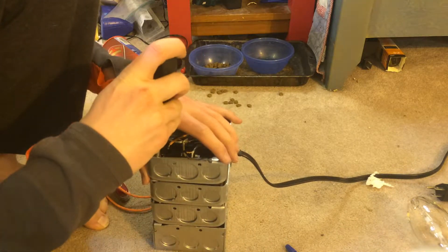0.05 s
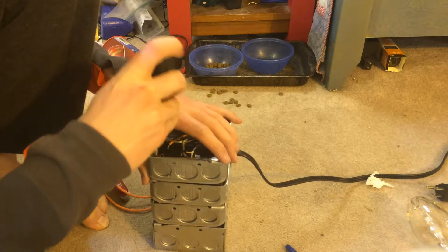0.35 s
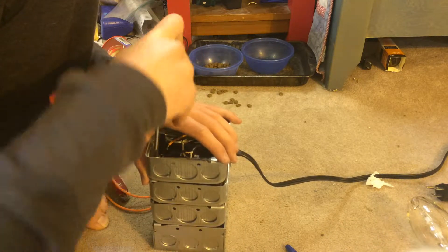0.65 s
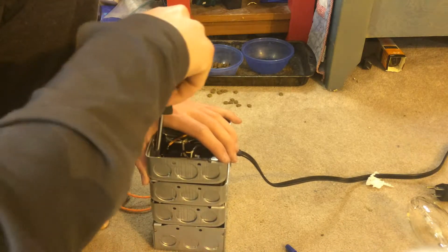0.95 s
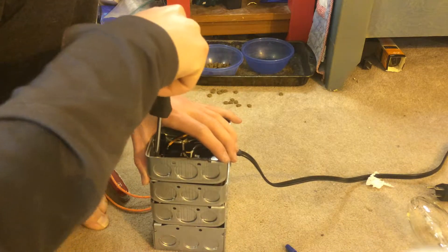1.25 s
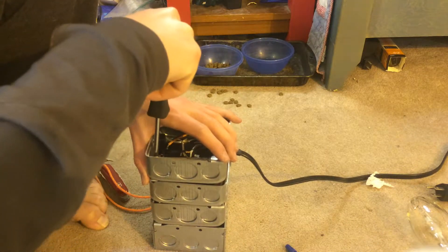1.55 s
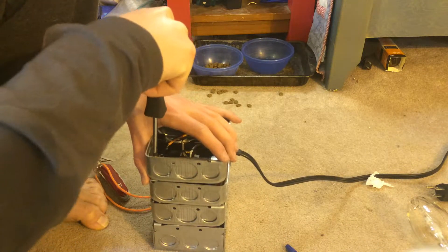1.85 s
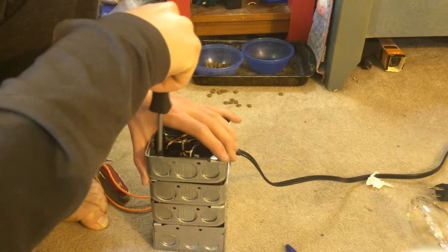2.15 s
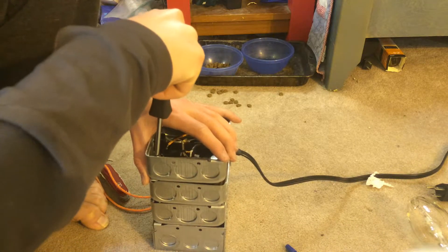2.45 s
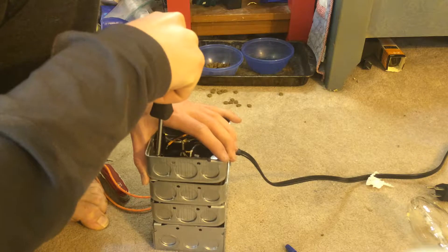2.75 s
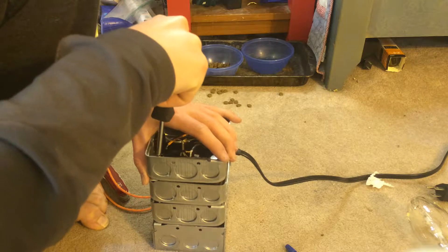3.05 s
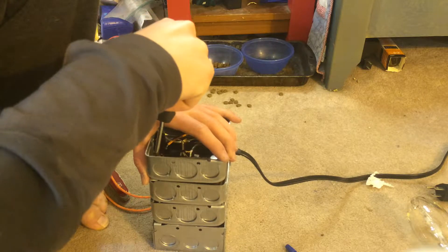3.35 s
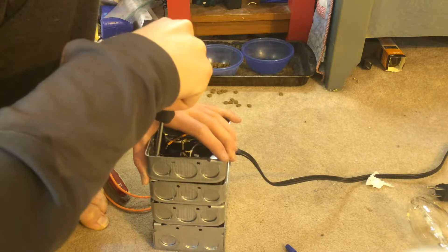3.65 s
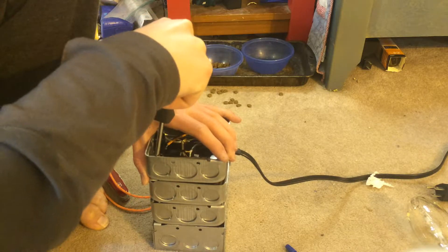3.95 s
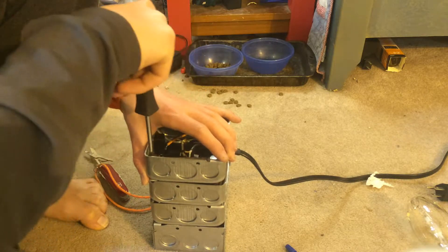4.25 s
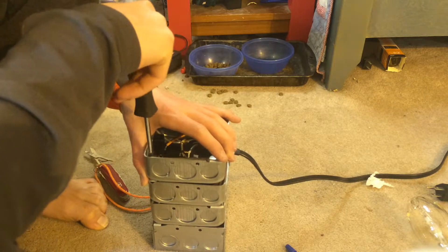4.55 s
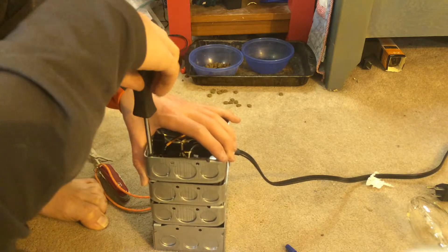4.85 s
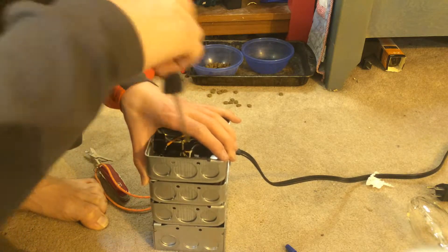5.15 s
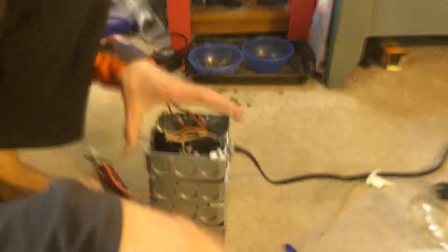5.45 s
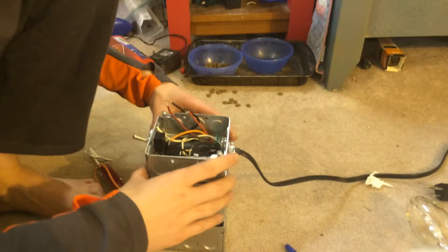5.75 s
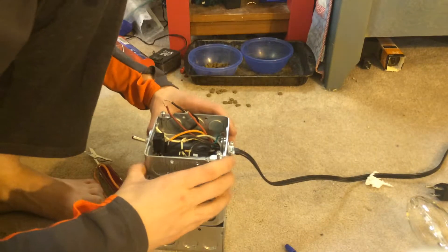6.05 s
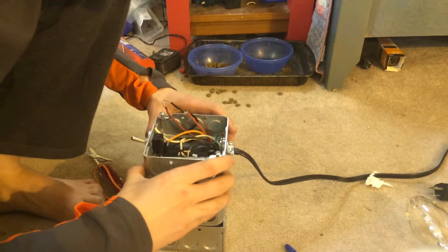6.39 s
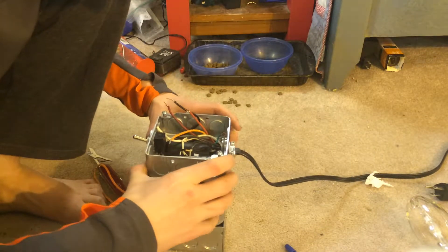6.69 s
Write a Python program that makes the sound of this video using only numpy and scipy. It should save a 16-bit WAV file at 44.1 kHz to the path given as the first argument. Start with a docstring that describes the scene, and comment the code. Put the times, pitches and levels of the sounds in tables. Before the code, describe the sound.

In a small carpeted room with a faint motor hum, hands softly brush a stack of steel boxes. A screwdriver turns a screw in the corner: the tip makes scattered sharp clicks, and the thread grinds briefly and squeaks once. Near the end the stack is grabbed and rocks on the carpet with a few dull, rattling knocks. The microphone is close, with only a short echo.

```python
"""A faint motor hum in a small carpeted room; close to the microphone, hands brush a stack of steel boxes.
A screwdriver works a screw in the stack's corner: its tip clicks in the screw head, ringing shaft and
box walls, and the thread grinds in tiny slips and squeaks once. Then the stack is grabbed and rocks
on the carpet with a few dull, rattling knocks. Mono, mostly direct sound, with a short room echo."""
import sys
import numpy as np
from scipy import signal
from scipy.fft import rfft, irfft
from scipy.io import wavfile
from scipy.ndimage import uniform_filter1d

SR = 44100
rng = np.random.default_rng(int(sys.argv[2]) if len(sys.argv) > 2 else 0)


def persist_wave(psi):
    """Save psi, clipped to +-1, as 16-bit WAV."""
    counts = np.round(np.clip(psi, -1, 1) * 32767).astype(np.int16)
    wavfile.write(sys.argv[1], SR, np.atleast_2d(counts).T)


N = 296350
TIME = np.arange(N) / SR

# Levels in the tables are relative; the functions set the balance at the microphone.
# spectrum of the room's air: pitch_hz, level_db
AIR_SPECTRUM = [(15, -50), (25, -28.5), (92, -11), (102, -5), (123, -4), (161, -23.5), (175, -16),
                (242, -27), (416, -27.5), (476, -28), (607, -33), (714, -34), (1790, -40.5), (14400, -47.5),
                (16000, -60)]
# lines of the motor hum: pitch_hz, level_db
MOTOR_LINES = [(119.8, -60), (150.7, -65.5), (240, -78.5), (360.5, -82), (479.3, -76.5)]
# decay of the room echo: pitch_hz, t60_s
ECHO_DECAY = [(100, 0.3), (400, 0.24), (1500, 0.42), (5000, 0.2), (15000, 0.23)]
# colour of the room echo: pitch_hz, level_db
ECHO_COLOUR = [(100, -2), (400, 1.5), (1400, -1), (3000, 6), (7000, 4.5), (15000, -8.5)]
# hands brush the boxes: start_s, end_s, level_db
HAND_STROKES = [(.17, .2, -69), (.27, .36, -73), (.56, .69, -77.5), (1.3, 1.43, -80), (1.86, 1.93, -77),
                (3.2, 3.24, -73.5), (5.48, 5.54, -66.5), (5.77, 5.92, -67), (6.2, 6.3, -75.5),
                (6.6, 6.72, -76)]
# panel resonances under a hand: pitch_hz, width_hz, gain_db
PANEL_RESONANCES = [(820, 310, 8), (1290, 1200, 5)]
# the stack shifts on the carpet: start_s, end_s, level_db
CARPET_STROKES = [(5.518, 5.54, -30), (5.54, 5.58, -32.5), (5.752, 5.782, -37), (5.8, 5.925, -50.5),
                  (5.93, 5.99, -50), (6.02, 6.06, -58)]
# floor resonance under the stack: pitch_hz, width_hz, gain_db
FLOOR_RESONANCE = [(110, 25, 7.5)]
# the stack rocks: start_s, level_db, contact_cutoff_hz, thump_db, rattle_db
STACK_BLOWS = [(5.5313, -6, 1589, 0, -20.5), (5.55, -19, 1705, 3.5, -9), (5.603, -17.5, 1264, -5, -27.5),
               (5.628, -24, 1250, -7, -40), (5.704, -29.5, 1250, -2, -31), (5.7238, -8, 1808, 1, -24),
               (5.764, -40, 385, 7.5, -18.5), (5.836, -40, 500, 1, -21), (5.9235, -17.5, 1077, -9, -27.5)]
# the stack's broad response to a blow: pitch_hz, width_hz, level_db
STACK_RESPONSE = [(121, 52, 5), (326, 140, 8.5), (410, 150, 6), (900, 152.2, 1.5), (1070, 160, 0),
                  (1555, 390, 0), (2850, 590, 4), (4440, 610, 7)]
# the stack's lasting modes: pitch_hz, level_db, t60_s
STACK_RINGING = [(85, -6.5, 0.28), (115.2, 1, 0.32), (184, -14, 0.19), (265, -12.5, .25),
                 (298, -0.5, 0.063), (348.5, 3, 0.26), (407, 1, 0.14), (440.4, -9.5, 0.23),
                 (574, -12.5, 0.4), (793, -10, 0.11), (918, -2.5, 0.17), (1045, -8, .12), (1100, -8, .12),
                 (1260, -8.5, 0.31), (1336, -10, 0.23), (1493, -9, 0.26), (1708, -18.5, 0.17),
                 (1920, -23.5, .35), (2444, -14, 0.31)]
# two bands where the stack hardly radiates, and one lift: pitch_hz, width_hz, gain_db
STACK_RADIATION = [(670, 108, -27.5), (2300, 370, -15), (3930, 250, 4.5)]
# the thread grinds: start_s, end_s, level_db
THREAD_STROKES = [(2.036, 2.08, -50.5), (2.08, 2.33, -67), (2.349, 2.408, -50), (3.18, 3.29, -75),
                  (3.287, 3.307, -57), (3.695, 3.725, -68.5), (3.79, 3.9, -73), (4.82, 4.95, -80)]
# resonances that the grinding brings out: pitch_hz, width_hz, gain_db
THREAD_RESONANCES = [(1250, 150, 11.5), (1808, 187, 7), (2450, 150, 6), (2920, 250, 7), (4760, 1300, 10),
                     (6640, 700, 6.5), (8400, 493, 2.5), (12910, 200, 12.5)]
# box wall modes under a light touch: pitch_hz, level_db, t60_s
WALL_MODES = [(353.5, -3.5, 0.081), (515.3, -5.5, 0.073), (679.4, -6.5, 0.0704), (766, -2.5, 0.062),
              (900, 1.5, 0.063), (1116, 2.5, 0.046), (1200, -0.5, .06), (1546, -2, 0.13)]
# shaft and screw resonances: pitch_hz, width_hz, gain_db
SHAFT_RESONANCES = [(1960, 170, 0), (4000, 1300, -9.5), (4513, 630, 10), (5434, 300, 6.5), (6800, 410, 10),
                    (7979, 1300, 9), (9250, 270, 0), (11700, 300, 2.5), (12800, 840, 2.5),
                    (14680, 700, 4.5)]
# the tip touches screw or box: start_s, steel_db, box_db, bright_db, ring_hz, tock_hz, rebound_s (0: none)
TIP_TOUCHES = [(0.291, -64, -56.5, -6, 4000, 545, .008), (0.396, -56, -54, -5.5, 3940, 1470, 0.0032),
               (1.318, -92, -66, -6, 3570, 575, 0), (1.607, -63, -72.5, -14, 2003, 1390, 0),
               (2.014, -35.5, -45.5, 5, 2078, 2080, 0.00041), (2.018, -20, -42, -5, 8220, 908.5, 0),
               (2.0318, -24.5, -45, 2.5, 11450, 1120, 0.0017), (2.077, -42, -48, -3, 7300, 864, 0),
               (2.199, -53, -68, -15, 4930, 640, 0.0019), (2.227, -56, -61, -4.5, 6664, 1250, 0.0018),
               (2.333, -30.5, -55.5, -2, 8810, 1544, 0), (2.347, -40, -57.5, -5, 8490, 2000, 0.002),
               (2.4143, -43, -45.5, -8, 4200, 1303, 0), (2.66, -66.5, -53, -3, 4700, 1090, 0.0003),
               (2.875, -32.5, -59, 0, 4712, 897.6, .011), (2.894, -44.5, -55, -3.5, 8240, 892, 0),
               (2.947, -71.5, -47.5, -8, 4174, 950, 0), (3.291, -50, -55, -12, 2220, 1301, 0.0039),
               (3.54, -39, -50, -10.5, 4020, 1136, 0.0021), (3.719, -60.5, -63.5, -2, 3820, 1290, 0.0033),
               (3.774, -50, -64, -1, 4450, 856.4, 0.014), (3.822, -55, -61, -6, 11240, 1490, 0.0024),
               (3.856, -52, -52, -5, 4945, 1237, 0.0051), (4.373, -44.5, -52.5, -4, 5220, 665, 0.0029),
               (5.141, -52, -71.5, -14, 3997, 1753, 0.0019), (5.146, -44, -61.5, -3, 4085, 1379, 0.0041),
               (5.291, -41, -63, -16, 3950, 2120, 0), (5.5651, -39.5, -41, -4, 7470, 1190, 0)]
# limits of a click's box, middle, steel and top bands: edge_hz
CLICK_BANDS = [200, 1500, 4000, 9500, 15800]


def from_db(db):
    """Decibels to gain."""
    return 10 ** (np.asarray(db) / 20)


def rms_one(x):
    """Scale to rms 1."""
    return x / np.sqrt(np.mean(x ** 2) + 1e-20)


def burst_one(x):
    """Scale so that the loudest four milliseconds have rms 1."""
    return x / np.sqrt(uniform_filter1d(x ** 2, size=176).max() + 1e-20)


def at_hz(points, hz):
    """Read a table on a log-frequency axis."""
    pitches, values = np.transpose(points)
    return np.interp(np.log(hz + 1e-9), np.log(pitches), values)


def dying(age, t60):
    """Exponential decay, 60 dB in t60 seconds."""
    return np.exp(-np.log(1000) * age / max(t60, 1e-4))


def damped_sine(age, hz, t60):
    """One freely decaying vibration."""
    return np.sin(2 * np.pi * hz * age) * dying(age, t60)


def band(x, hz, kind, order=2):
    """Butterworth filter."""
    sections = signal.butter(order, np.clip(hz, 10, .45 * SR), kind, fs=SR, output="sos")
    return signal.sosfilt(sections, x + 1e-18)


def resonate(x, hz, width):
    """One resonance with gain 1 at its peak."""
    r = np.exp(-np.pi * width / SR)
    poles = [1, -2 * r * np.cos(2 * np.pi * hz / SR), r * r]
    return signal.lfilter(np.array([1, 0, -1]) * (1 - r * r) / 2, poles, x + 1e-18)


def emphasise(x, peaks):
    """Lift or cut a sound in each band of a body's response."""
    for hz, width, db in peaks:
        x = x + (from_db(db) - 1) * resonate(x, hz, width)
    return x


def ringing(modes, age, spread_db):
    """Decaying modes, each struck with a random strength and sign."""
    draws = rng.standard_normal((len(modes), 2))
    return sum(np.sign(sign) * from_db(db - spread_db * luck) * damped_sine(age, hz, t60)
               for (hz, db, t60), (luck, sign) in zip(modes, draws))


def add(out, start_s, sound):
    """Mix a sound in at a time."""
    i = int(start_s * SR)
    out[i:i + len(sound)] += sound[:N - i]


def room_air(level_db=-72.5):
    """Room tone: steady air noise with a dip at 110 Hz; the level holds for the part above 200 Hz."""
    hz = np.fft.rfftfreq(N, 1 / SR)
    air = irfft(rfft(rng.standard_normal(N)) * from_db(at_hz(AIR_SPECTRUM, hz)), N)
    air = air - .6 * resonate(air, 110, 45)
    return from_db(level_db) * air / np.std(band(air, 200, "high", order=6))


def motor_hum(gain_db=-3, waver=.15):
    """A motor in the background: low lines, each wavering slightly in level."""
    hum = np.zeros(N)
    for hz, db in MOTOR_LINES:
        line = from_db(db) * np.sqrt(2) * np.sin(2 * np.pi * (hz * TIME + rng.random()))
        drift = rms_one(band(rng.standard_normal(N), 5, "low"))
        hum += line * (1 + waver * drift)
    return from_db(gain_db) * hum


def room_echo(x, onset_s=0.0015):
    """The small room's diffuse echo builds up in a few milliseconds and lasts longest in the middle range."""
    age, echo = TIME[:SR], 0
    edges = np.geomspace(40, 18000, 13)
    for lo, hi in zip(edges, edges[1:]):
        hz = np.sqrt(lo * hi)
        noise = band(rng.standard_normal(SR), [lo, hi], "band")
        echo = echo + from_db(at_hz(ECHO_COLOUR, hz)) * noise * dying(age, at_hz(ECHO_DECAY, hz))
    echo = echo * (1 - np.exp(-(age / onset_s) ** 2))
    return signal.fftconvolve(x, echo / np.sqrt(np.sum(echo ** 2)))[:N]


def friction(strokes, body, low_hz, top_hz, brightening, slips_per_s, rough_db, edge_s):
    """Dense, uneven slips coloured by the rubbed body; lighter strokes are duller."""
    out, hardest_db = np.zeros(N), max(db for _, _, db in strokes)
    for start_s, end_s, db in strokes:
        age = TIME[:int(max(end_s - start_s, edge_s) * SR)]
        direction, size = rng.standard_normal((2, SR))[:, :len(age)]
        slipping = rng.random(SR)[:len(age)] < slips_per_s / SR
        slips = slipping * np.sign(direction) * from_db(rough_db * size)
        cutoff_hz = top_hz * from_db(brightening * (db - hardest_db))
        rub = band(band(emphasise(slips, body), low_hz, "high"), cutoff_hz, "low")
        fade = np.clip(np.minimum(age, age[::-1]) / edge_s, 0, 1)
        add(out, start_s, from_db(db) * rms_one(rub) * fade)
    return out


def hand_brushes():
    """Skin slides softly over the steel panels."""
    return friction(HAND_STROKES, PANEL_RESONANCES, low_hz=406.3, top_hz=1800,
                    brightening=0.042, slips_per_s=1500, rough_db=3, edge_s=0.0083)


def carpet_shifts():
    """The stack drags on the carpet and the floor rumbles under it."""
    return friction(CARPET_STROKES, FLOOR_RESONANCE, low_hz=88, top_hz=140,
                    brightening=.05, slips_per_s=1100, rough_db=2, edge_s=0.0078)


def stack_knocks(wall_db=-7.5, crunch_db=-16, clatter_db=-11, modes_db=-27.5, tick_db=-19, thump_hz=115):
    """Each blow of the rocking stack: a blunt pulse, loose boxes rattling, modes, a tick of bare metal."""
    out, age = np.zeros(N), TIME[:SR]
    pulse = sum((-1) ** k * from_db(db) * resonate(signal.unit_impulse(SR), hz, width)
                for k, (hz, width, db) in enumerate(STACK_RESPONSE))
    for start_s, db, contact_hz, thump_db, rattle_db in STACK_BLOWS:
        shake, grit, seams = rng.standard_normal((3, SR))
        blow = band(pulse, contact_hz, "low", order=4)
        # the struck wall rings just under the contact cut-off until the hand damps it
        wall_hz = 0.826 * contact_hz
        wall = from_db(wall_db) * band(damped_sine(age, wall_hz, t60=0.011), 1.12 * wall_hz, "low", order=3)
        shaken = signal.fftconvolve(shake, blow)[:SR]
        rattle = rms_one(band(shaken, 1400, "low", order=1)) * dying(age, t60=0.18)
        # the seams between the boxes close one after another within milliseconds
        seams = rms_one(band(band(seams, 630, "high"), contact_hz, "low", order=6))
        crunch = from_db(crunch_db) * seams * dying(age, t60=0.023)
        # wires and rims clatter above the rattle
        clatter = from_db(clatter_db) * band(grit, [2800, 5500], "band", order=1) * dying(age, t60=0.1)
        modes = band(ringing(STACK_RINGING, age, spread_db=1.5), contact_hz, "low", order=4)
        body = blow / np.abs(blow).max() + wall + crunch
        body += from_db(rattle_db) * (rattle + clatter) + from_db(modes_db) * modes
        body += (from_db(thump_db) - 1) * band(body, thump_hz, "low", order=1)
        tick = from_db(tick_db) * band(grit * dying(age, t60=0.0029), [3200, 9000], "band")
        add(out, start_s, from_db(db) * (body + tick))
    # the stack hardly radiates in the deep bass or between its groups of modes
    return band(emphasise(out, STACK_RADIATION), 50, "high", order=1)


def thread_grind():
    """Steel thread rubs on steel in bright, gritty strokes."""
    return friction(THREAD_STROKES, THREAD_RESONANCES, low_hz=520, top_hz=13500,
                    brightening=0.35, slips_per_s=3000, rough_db=3, edge_s=0.0045)


def thread_squeak(start_s=2.13, length_s=.125, attack_s=.035, pitch_hz=473, rise_hz_per_s=2150,
                  level_db=-57, fade_db_per_s=50, jitter=0.042, overtone=0.099):
    """Slightly uneven stick-slip of the thread, rising as the screw speeds up."""
    out, age = np.zeros(N), TIME[:int(length_s * SR)]
    wobble = 1 + jitter * rms_one(band(rng.standard_normal(SR), 160, "low"))[:len(age)]
    phase = 2 * np.pi * np.cumsum((pitch_hz + rise_hz_per_s * age) * wobble) / SR
    swell = np.minimum(age / attack_s, 1) * from_db(level_db - fade_db_per_s * age)
    add(out, start_s, swell * (np.sin(phase) + overtone * np.sin(2 * phase)))
    return out


def tip_contacts():
    """Every touch of the tip, then its weaker but sharper rebound if it has one."""
    for start_s, steel_db, box_db, bright_db, ring_hz, tock_hz, rebound_s in TIP_TOUCHES:
        yield start_s, steel_db, box_db, bright_db, ring_hz, tock_hz
        if rebound_s > 0:
            yield start_s + rebound_s, steel_db - 2, box_db - 1, bright_db + 4.5, ring_hz, tock_hz


def tip_clicks(gain_db=-4, snap=3, click_delay_s=0.00099, wall_noise_db=-3.5, ring_db=4,
               tock_db=2.5, tock_cycles=100):
    """The tip snaps on the screw and chatters, the box tocks; returns these hits and the shaft's pings."""
    hits, pings = np.zeros((2, N))
    age = TIME[:SR // 6]
    for start_s, steel_db, box_db, bright_db, ring_hz, tock_hz in tip_contacts():
        grain, size_db = rng.standard_normal((2, len(age)))
        grain = rms_one(grain * from_db(size_db))
        grain[0] = snap
        # harder contacts settle sooner; lighter touches last longer and so are duller
        chatter_t60 = 0.019 * from_db(-0.13 * (steel_db + 40))
        contact_hz = 60000 * from_db(0.31 * steel_db)
        steel = band(emphasise(grain * dying(age, chatter_t60), SHAFT_RESONANCES), contact_hz, "low")
        wall = burst_one(ringing(WALL_MODES, age, spread_db=0.5))
        wall += from_db(wall_noise_db) * burst_one(band(grain * dying(age, t60=0.15), 1500, "low"))
        # the wall fills the lowest band, the steel the three above
        middle_db = (box_db + steel_db) / 2 + 0.5
        levels_db = [box_db, middle_db, steel_db, steel_db + bright_db]
        parts = zip([wall, steel, steel, steel], CLICK_BANDS, CLICK_BANDS[1:], levels_db)
        hit = sum(from_db(db) * burst_one(band(x, [lo, hi], "band", order=3)) for x, lo, hi, db in parts)
        # where the tip catches decides which modes of shaft and box ring out
        ping = from_db(ring_db + steel_db) * damped_sine(age, ring_hz, t60=0.025)
        tock = band(damped_sine(age, tock_hz, t60=tock_cycles / tock_hz), 1400, "low")
        tock *= from_db(tock_db + (middle_db if tock_hz > CLICK_BANDS[1] else box_db))
        # each click sounds about a millisecond after its listed time
        add(hits, start_s + click_delay_s, hit + tock)
        add(pings, start_s + click_delay_s, ping)
    return from_db(gain_db) * hits, from_db(gain_db) * pings


def scene():
    """Tool and stack near one microphone, the room around; the thin shaft's pings arrive only directly."""
    hits, pings = tip_clicks()
    handwork = hits + thread_squeak() + thread_grind() + hand_brushes()
    stack = stack_knocks() + carpet_shifts()
    echo = room_echo(from_db(-12) * handwork + from_db(-17.5) * stack)
    return (handwork + pings + stack + echo + room_air() + motor_hum())[None]


def record(dry, cutoff_hz=15700):
    """The microphone signal is cut steeply at the top."""
    return signal.sosfilt(signal.ellip(10, .2, 70, cutoff_hz, fs=SR, output="sos"), dry)


dry = scene()
out = record(dry)
persist_wave(out)
```